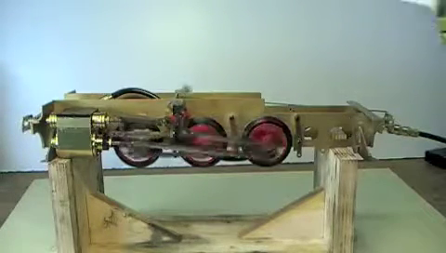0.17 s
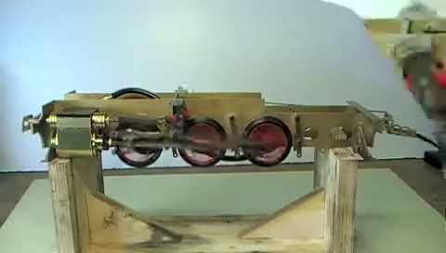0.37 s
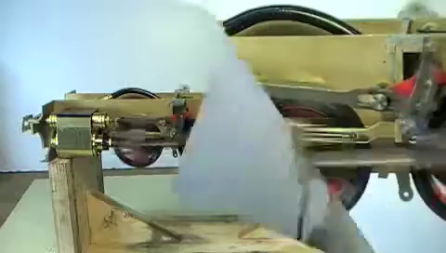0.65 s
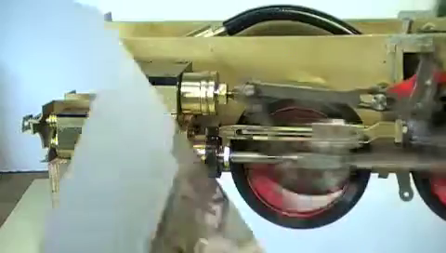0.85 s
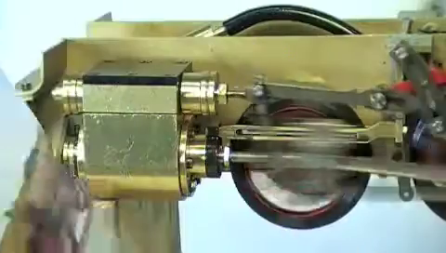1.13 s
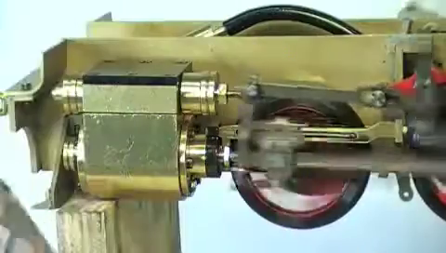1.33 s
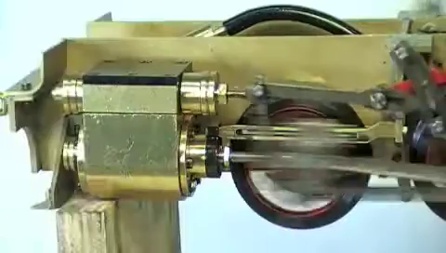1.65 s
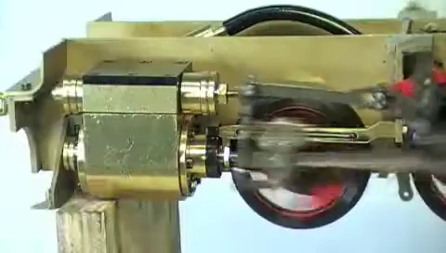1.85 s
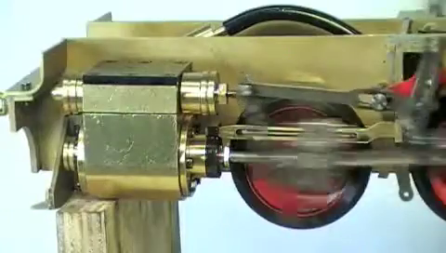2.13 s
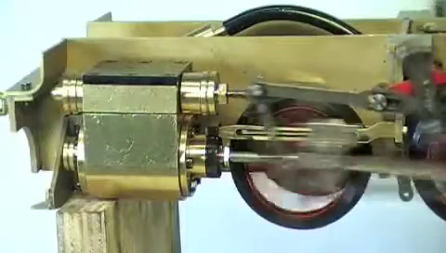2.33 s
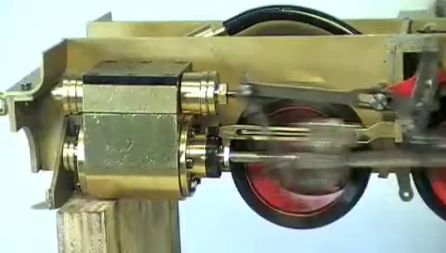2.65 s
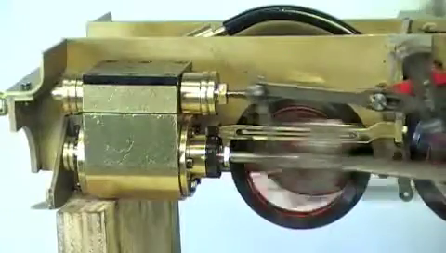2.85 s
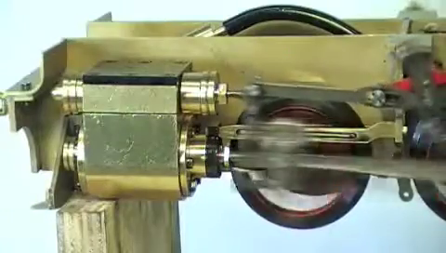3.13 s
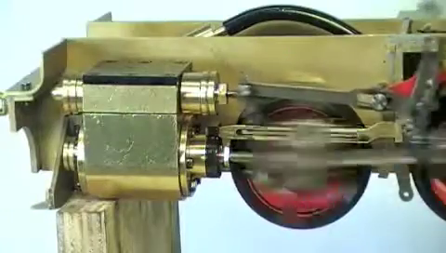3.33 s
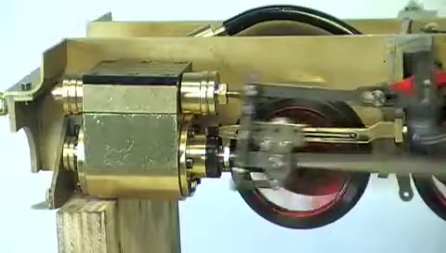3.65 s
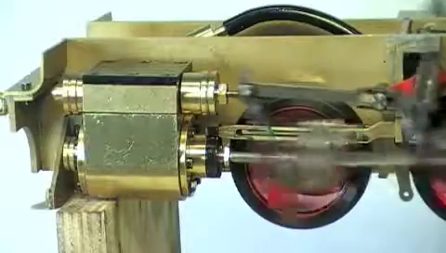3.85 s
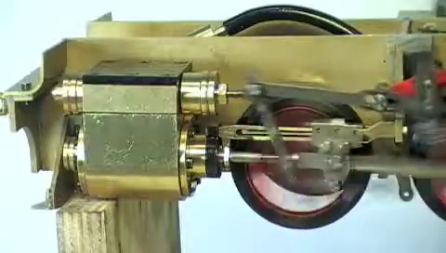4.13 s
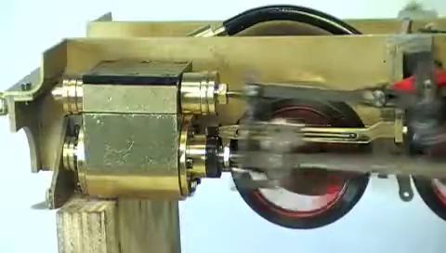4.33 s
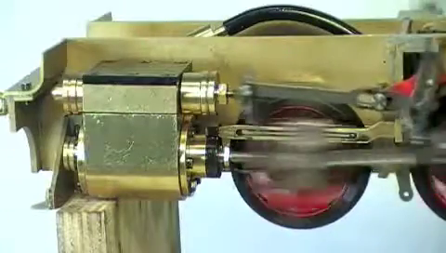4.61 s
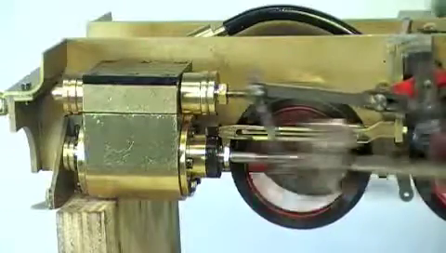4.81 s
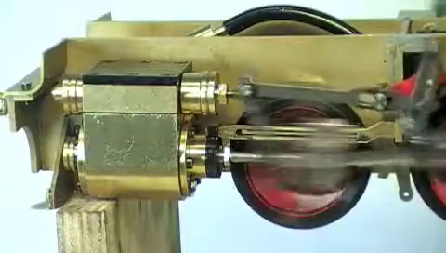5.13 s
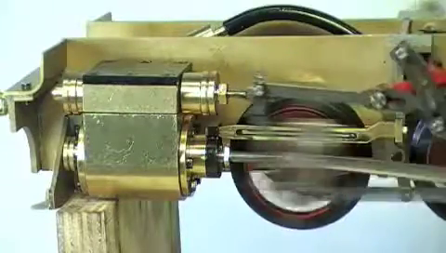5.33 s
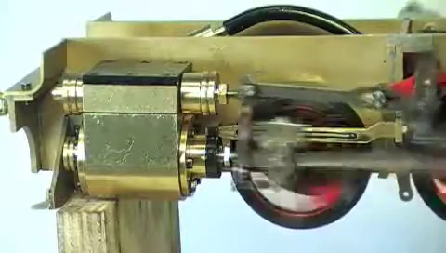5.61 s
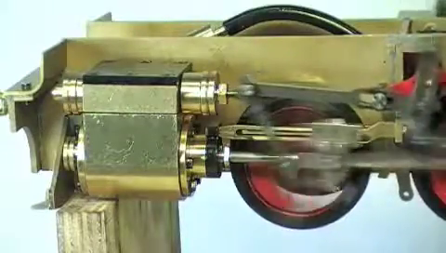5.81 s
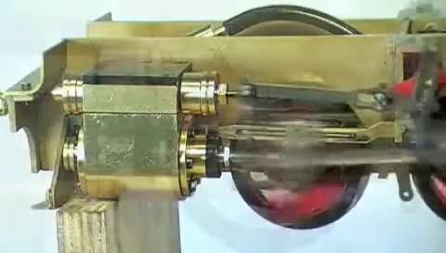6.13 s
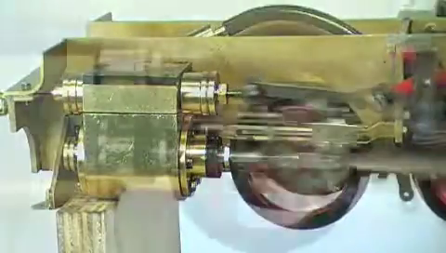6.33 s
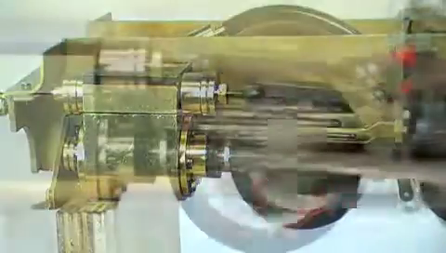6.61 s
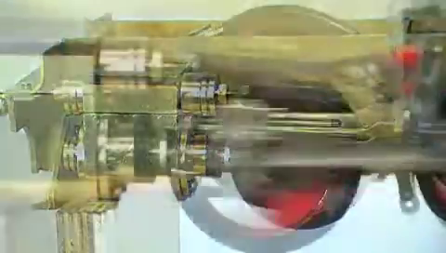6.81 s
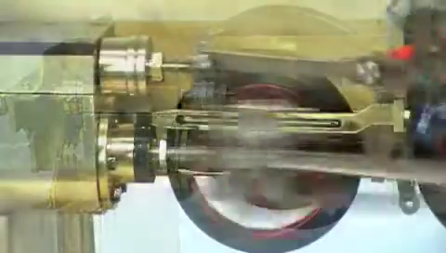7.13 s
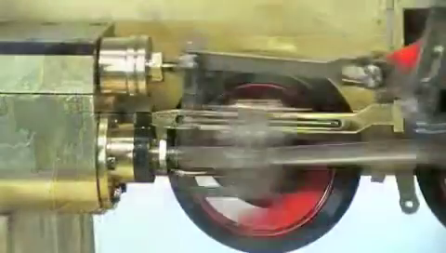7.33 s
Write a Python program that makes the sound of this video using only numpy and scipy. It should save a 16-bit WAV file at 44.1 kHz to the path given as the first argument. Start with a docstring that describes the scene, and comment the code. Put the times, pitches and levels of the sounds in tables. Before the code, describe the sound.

A small model steam locomotive runs at a fast, even speed on a wooden stand. Its exhaust beats blur into a rapid hissing flutter over a steady leak, while metal rods knock and the valve gear clicks, with tiny wet squeaks and a faint hum. After about a second the sound seems closer, and light stray clinks join in, mostly in the second half. The microphone is straight in front, in a small, fairly dry room.

```python
"""Model locomotive running free

A two-cylinder chassis turns about 13 times a second on a wooden stand in a small room. The crank angle
times four hissing exhaust beats a turn, valve-gear clicks, wet squeaks, the rub and groan of slides, and
knocks of slack rods that ring frame and stand. A leak, a frame hum, spits and stray clinks join them.
Of the run's four stretches, the first and last overlap their neighbours in slow fades; the others abut."""
import sys
import numpy as np
from scipy import signal
from scipy.fft import rfft, irfft, next_fast_len
from scipy.io import wavfile

SR = 44100
rng = np.random.default_rng(int(sys.argv[2]) if len(sys.argv) > 2 else 0)


def output_pcm(signal):
    """Save a mono or channel-first signal as 16-bit PCM at the path in sys.argv[1].

    Samples are clipped to [-1, 1] before scaling.
    """
    pcm = np.clip(np.atleast_2d(signal).T, -1, 1) * 32767
    wavfile.write(sys.argv[1], SR, np.round(pcm).astype(np.int16))


N = 328986
T = np.arange(N) / SR
SIZE = next_fast_len(N + SR // 2)
HZ = np.maximum(np.fft.rfftfreq(SIZE, 1 / SR), 1)

# Stretches of the run. Each row: start, fade-in, end and fade-out in seconds, starting crank angle in
# turns, speed in turns per second, slowing in turns per second squared.
STRETCHES = [(0, .001, 1.7, 1.7, .007, 13.67, .011), (0, 1.75, 4.062, .004, .012, 13.415, .0169),
             (4.058, .004, 7.55, 1.8, .606, 13.264, .046), (5.8, 1.8, 7.6, .001, .64, 13.31, 0)]
# Balance of each stretch. Each row: gains in dB of bark, hiss, knocks, squeaks and clicks, groans,
# the clicks' lower mode, and the low, middle and high hum.
EFFORT = [(1.3, -0.2, 0.67, -0.24, -2.4, 2.5, -41, -32.5, -58),
          (0.33, -0.23, 2, -0.7, -0.4, -1.5, -30.5, -73, -47),
          (0, -0.4, 0.88, -0.24, -0.56, 0, -31, -52, -49),
          (0.77, -1.1, 0.6, -1.2, -0.69, 3, -32.5, -61, -46.5)]
# Frame modes that hum. Each entry: frequency in Hz.
HUM_HZ = [267.7, 290, 361]
# Knocks of rods (one heavy) and axleboxes. Each row: angle in turns, contact in seconds, level in dB.
KNOCKS = [(.005, 0.00023, 1.5), (.047, 0.00025, -4), (.184, 0.000059, -8.5), (0.264, 0.00035, 5.5),
          (0.325, 0.0002, -6), (0.708, 0.00012, -2.5), (0.892, 0.00032, 0)]
# Squeaks at glands and ports. Each row: angle in turns, pitch in Hz, relative pitch scatter,
# half length in seconds, level in dB in the first half of the run and in the second.
SQUEAKS = [(0.08, 6770, 0.12, 0.00087, -23, -23), (.148, 3120, 0.048, 0.0013, -24.5, -24),
           (.155, 2514, 0.035, 0.0026, -30, -25), (.162, 8280, 0.016, 0.0018, -20.5, -22),
           (0.245, 7870, 0.064, 0.0021, -29, -24.5), (0.262, 3600, 0.17, 0.00084, -22, -23),
           (0.371, 8600, 0.092, 0.00074, -23.5, -27), (0.471, 8330, 0.013, 0.0019, -30.5, -28),
           (.505, 5320, 0.12, 0.00095, -22, -23), (0.634, 3300, 0.022, 0.0025, -24.5, -25),
           (0.655, 8280, 0.027, 0.0014, -21, -20), (0.771, 7490, 0.0056, 0.0013, -20, -19.5),
           (0.771, 3530, 0.038, 0.00088, -26, -36), (0.821, 5630, .08, 0.00099, -28, -35),
           (0.858, 8400, 0.016, 0.00065, -33, -34), (.877, 2430, 0.038, 0.0013, -28, -29)]
# Groans. Each row: angle in turns, pitch in Hz, half length in seconds, level in dB in each half run.
GROANS = [(0.091, 1130, 0.0008, -26.5, -36), (0.1, 578, 0.0039, -26, -25), (0.147, 1460, 0.0034, -39, -32),
          (0.148, 992.4, 0.012, -37.5, -36), (.252, 779, 0.004, -23, -23),
          (0.298, 348, 0.0029, -30.5, -26.5), (.45, 690, 0.0034, -26.5, -29.5),
          (0.551, 611, 0.013, -39, -38), (.64, 1235, 0.0034, -36, -40), (0.698, 590, 0.0088, -47.5, -45),
          (0.735, 771, 0.0043, -29.5, -35.5), (0.882, 1460, 0.0025, -29, -32),
          (0.961, 805, 0.0052, -34, -30)]
# Exhaust beats. Each row: angle, rise and length in turns, levels of bark, hiss and opening crack in dB.
BEATS = [(0.106, 0.012, 0.18, 11.5, 4.5, 4), (0.445, 0.016, 0.14, 9, 4.5, 7.5),
         (0.571, 0.0097, 0.27, 9.5, 2.5, 14), (0.83, 0.0084, 0.084, -3, 5.5, 17)]
# Lower and upper valve-gear modes. Each row: frequency in Hz, decay time in seconds.
GEAR_MODES = [(2560, 0.002), (3250, 0.0018)]
# Valve reversals. Each row: angle in turns, levels of the lower and upper gear mode in dB.
CLICKS = [(.122, -26, -25.5), (.461, -22, -22.5), (.585, -31.5, -26.5), (.836, -22, -24.5)]
# Harder catches of the gear. Each row: start in seconds, levels of the lower and upper mode in dB.
CLINKS = [(1.7997, -30, -15), (1.84, -14, -23), (1.8536, -15, -20), (2.572, -23, -13), (3.9485, -32, -16),
          (3.672, -14, -24), (3.8955, -19, -22), (4.2265, -16, -24), (4.2495, -20, -21), (4.2836, -30, -13),
          (4.3025, -13, -29), (4.7775, -14, -32), (4.8305, -10, -29), (4.981, -15, -16),
          (5.134, -10.5, -12), (5.307, -24, -20), (5.3433, -11, -16), (5.4935, -17, -21), (5.512, -15, -16),
          (5.5881, -11, -25), (5.6626, -16, -18), (5.6855, -28, -12), (5.721, -24, -15), (5.7385, -13, -27),
          (5.7613, -17, -22), (5.8366, -15, -22), (5.988, -14, -22), (6.101, -15, -24),
          (6.1189, -11.5, -24), (6.1775, -19, -26), (6.2161, -17, -18), (6.2925, -19, -25),
          (7.4145, -21, -28)]

# Resonators. Each row: frequency in Hz, bandwidth in Hz, relative level in dB.
FRAME_MODES = [(41.5, 23, -27), (104.9, 3.1, 0.5), (142.8, 13.6, 1), (173.2, 5.4, -0.5), (199.5, 36, -4.5),
               (304, 33, 2.5), (370.6, 11.2, -0.5), (393, 25, 6.5), (511.4, 11.5, 5), (573.2, 17, 8.5),
               (601.8, 8.8, 6.5), (639, 10, 8.5), (750, 29, 9), (819.7, 9.7, 11), (897, 14, 9.5),
               (979.3, 9.7, 9.5), (1025, 16, 9), (1234, 38, 2.5), (1370, 93, 5.5), (1817, 49, 13),
               (2780, 470, -16)]  # frame and stand
ROD_MODES = [(2500, 250, -16), (3350, 250, -10), (3940, 55, 7)]  # metal rods
BARK_MODES = [(1490, 820, 0), (2386, 380, 6.5), (2870, 180, 4), (3275, 270, 1), (3380, 140, -43),
              (3580, 27, -36)]  # exhaust passage, low
WHISTLE_MODES = [(7210, 110, -1), (7800, 130, 4.5), (8220, 77, 8.5), (8530, 130, 0), (10600, 110, 4.5),
                 (12370, 170, -4)]  # exhaust passage, high

# Spectra and filters. Each row: frequency in Hz, relative level in dB.
SCRAPE_COLOUR = [(60, -41), (110, -12.5), (250, 3), (420, 5), (470, 8), (600, -1), (690, -2.5), (900, -1),
                 (1100, -3), (1350, -3.5), (1700, 1), (2100, -12), (3000, -21), (5000, -37)]  # slide bars
LEAK_COLOUR = [(60, -31), (130, -17), (400, -15), (750, -9), (1100, -7), (1900, -2.5), (3200, 1),
               (4600, -3), (8400, -2), (9300, -6), (10700, -6), (11700, -16), (13300, -16)]  # steady leak
JET_COLOUR = [(50, -24), (130, -13), (450, -1), (800, -2.5), (1400, 1.5), (2000, -5.5), (3300, 0.5),
              (4500, -0.5), (6200, 1), (7200, -1), (8800, -1.5), (10200, -9.5), (11600, -41), (14500, -49)]  # broad rush of each jet
SPIT_COLOUR = [(1500, -25), (4500, -2), (8400, 0), (10500, -3), (13000, -9)]  # bursting droplets
FAR_COLOUR = [(60, 0), (110, 5), (190, 4), (260, 0.5), (370, -5), (460, 4.5), (600, 0), (750, -1.5),
              (900, -0.5), (1060, 5), (1420, -4), (1720, 3), (1950, 1), (2400, -2), (2700, 4), (3100, 0.5),
              (4400, -2), (5000, 0.5), (5280, 1.5), (5600, -2.5), (6500, 0)]  # heard from farther back
PATH_COLOUR = [(50, 2), (62, -6), (78, 4), (105, 0.5), (140, 1), (172, 1), (215, -1.5), (290, -0.5),
               (385, 2.5), (470, -3), (510, -0.5), (640, 0.5), (685, -4.5), (735, 1), (1040, 1), (1100, -1),
               (1220, 1), (1650, -0.5), (2550, 0.5), (2750, -3), (2880, 0.5), (3750, 0), (4000, 1),
               (4350, -2.5), (5100, -0.5), (7000, -1), (7850, 1), (8030, -7), (8250, -0.5), (8800, 2.5),
               (9050, -2), (9500, .5)]  # peaks and notches from nearby surfaces
ROOM_COLOUR = [(50, 0), (130, -3), (270, -14), (500, -7), (900, -3), (2000, 1), (5000, 0), (8500, 3),
               (13000, -1)]  # room reflections
# Imbalance of the two microphones. Each row: frequency in Hz, left minus right in dB.
MIC_BALANCE = [(60, 6), (110, 1.5), (200, 1.5), (380, 3.5), (700, 0.5), (1290, 1), (2380, 1), (4400, -1.5),
               (8120, 0), (15000, 3)]


def undb(db):
    """Amplitude grows tenfold for every 20 dB."""
    return 10 ** (np.asarray(db) / 20)


def level(x, db):
    """Normalisation sets the rms level in dB."""
    return x * undb(db) / np.sqrt(np.mean(x ** 2))


def shape(x, response):
    """Linear filtering multiplies a spectrum by a frequency response."""
    return irfft(rfft(x, SIZE) * response, SIZE)[..., :N]


def colour(points):
    """Interpolation in log frequency joins (Hz, dB) points into a response."""
    hz, db = np.transpose(points)
    return undb(np.interp(np.log(HZ), np.log(hz), db))


def resonances(modes):
    """Modal superposition: the responses of damped modes add."""
    return sum(undb(db) / (1 + 1j * (HZ ** 2 - hz ** 2) / (HZ * width)) for hz, width, db in modes)


def per_turn(turn):
    """Cycle-to-cycle variation: one normal random value for each turn."""
    return rng.standard_normal(N // 1024)[np.floor(turn).astype(int) + 2]


def bell(s, length):
    """A Gaussian envelope swells and dies away around s = 0."""
    return np.exp(-np.minimum(abs(s / length), 10) ** 2)


def burst(s, hz, length, cycles=0):
    """Amplitude modulation by a bell curve makes a tone burst."""
    return bell(s, length) * np.sin(2 * np.pi * (hz * s + cycles))


def wheels(start, fade_in, end, fade_out, angle, speed, slowing):
    """Uniform deceleration gives the crank angle and speed over one faded stretch."""
    on = (T >= start) & (T <= end)
    s = T[on] - start
    fade = np.minimum(s / fade_in, 1) * np.minimum((end - T[on]) / fade_out, 1)
    turn = angle + speed * s - slowing * s ** 2 / 2
    return on, fade, turn, speed - slowing * s


def hum(turn, speed, levels_db, width_hz=5.8):
    """Forced vibration: each frame mode follows the nearest wheel harmonic, weaker when off resonance."""
    out = 0
    for hz, db in zip(HUM_HZ, levels_db):
        harmonic = round(hz / speed.mean())
        mistuning = 2 * (harmonic * speed - hz) / width_hz
        out = out + undb(db) / np.hypot(1, mistuning) * np.cos(2 * np.pi * harmonic * turn)
    return out


def scrape(turn, roughness):
    """Sliding friction: the crossheads pass the same rough spots of the slide bars on every turn."""
    return np.interp(turn, np.arange(len(roughness)) / len(roughness), roughness, period=1)


def turbulence(power, sputter_hz=600, sputter_db=1.2):
    """Turbulent gas makes noise that follows the flow and sputters with the moisture in it."""
    sputter = np.interp(T * sputter_hz, np.arange(N // 16), rng.standard_normal(N // 16))
    return np.sqrt(power) * undb(sputter_db * sputter) * rng.standard_normal(N)


def knocks(turn, speed, scatter_db=.4, slop_s=.00003):
    """Impact: a bearing takes up its play with a force pulse; the shorter the contact, the brighter."""
    out = 0
    for angle, contact_s, db in KNOCKS:
        since = turn - angle + .5
        s = (since % 1 - .5) / speed + slop_s * per_turn(since)
        impulse = undb(db + scatter_db * per_turn(since))
        out = out + impulse / contact_s * bell(s, contact_s)
    return out


def squeaks(turn, speed, half, scatter_db=2.2):
    """Flow-excited tones: wet gas whistles at set crank angles, varying in pitch and strength."""
    out = 0
    for angle, hz, scatter, length, *levels_db in SQUEAKS:
        since = turn - angle + .5
        s = (since % 1 - .5) / speed
        pitch = hz * np.exp(scatter * per_turn(since))
        gain = undb(levels_db[half] + scatter_db * per_turn(since))
        out = out + gain * burst(s, pitch, length, cycles=per_turn(since))
    return out


def groans(turn, speed, half):
    """Friction tones: slides and bearings groan as the load swings over, alike on every turn."""
    out = 0
    for angle, hz, length, *levels_db in GROANS:
        s = ((turn - angle + .5) % 1 - .5) / speed
        out = out + undb(levels_db[half]) * burst(s, hz, length)
    return out


def exhaust(turn, crack_turns=.046, scatter_db=.4, slop_turns=.003):
    """Blowdown: each port cracks open and its cylinder empties, giving the power of bark and hiss."""
    bark = hiss = 0
    for angle, rise, length, bark_db, hiss_db, crack_db in BEATS:
        since = turn - angle
        opened = np.maximum(since % 1 - slop_turns * per_turn(since), 0)
        port = (1 - bell(opened, rise)) * undb(scatter_db * per_turn(since))
        flow = port * bell(opened, length)
        crack = port * bell(opened, crack_turns)
        bark = bark + (flow * undb(bark_db)) ** 2 + (crack * undb(crack_db)) ** 2
        hiss = hiss + (flow * undb(hiss_db)) ** 2
    return bark, hiss


def spits(power, per_second=45, scatter_db=4):
    """Shot noise: droplets burst at random in the ports, loudest while the gas flows hardest."""
    drops = rng.random(N) < per_second / SR
    return drops * np.sqrt(power) * undb(scatter_db * np.clip(rng.standard_normal(N), -2, 2))


def gear_ring(s, levels_db, detune, rise_s=.00043, pitch_scatter=.03):
    """Free vibration: the two gear modes decay exponentially after a blow at s = 0."""
    s = np.maximum(s, 0)
    ring = 0
    for (hz, decay_s), db, offset in zip(GEAR_MODES, levels_db, detune):
        pitch = hz * (1 + pitch_scatter * offset)
        envelope = undb(db) * np.exp(-np.minimum(s / decay_s, 30))
        ring = ring + envelope * np.sin(2 * np.pi * pitch * s)
    return (1 - np.exp(-np.minimum(s / rise_s, 30))) * ring


def clicks(turn, speed, ring_db, scatter_db=1.2, slop_turns=.0012):
    """Periodic impacts: four valve reversals a turn strike the gear, each a little differently."""
    out = 0
    for angle, lower_db, upper_db in CLICKS:
        since = turn - angle
        s = (since % 1 - slop_turns * per_turn(since)) / speed
        levels_db = [db + scatter_db * per_turn(since) for db in (lower_db + ring_db, upper_db)]
        out = out + gear_ring(s, levels_db, detune=[per_turn(since) for _ in GEAR_MODES])
    return out


def clinks():
    """Isolated impacts: now and then the gear catches harder and rings out."""
    out = np.zeros(N)
    for (start, *levels_db), detune in zip(CLINKS, rng.standard_normal((len(CLINKS), 2))):
        near = slice(int(start * SR), int(start * SR) + SR // 20)
        out[near] += gear_ring(T[near] - start, levels_db, detune)
    return out


def engine(ripple_points=70, rough_spots=500, jet_lag_turns=.032):
    """Source and filter: the stretches' excitations add, then ring the same pipes and frame."""
    bark, hiss, leak, blows, rub, tones = np.zeros((6, N))
    # the valves judder in the same way on every turn and ripple the flow
    ripple_angles = np.arange(ripple_points) / ripple_points
    ripple_db = .8 * rng.standard_normal(ripple_points)
    roughness = rng.standard_normal(rough_spots)
    for index, (stretch, effort) in enumerate(zip(STRETCHES, EFFORT)):
        bark_db, hiss_db, knock_db, valve_db, groan_db, ring_db, *hum_db = effort
        half = index // 2
        on, fade, turn, speed = wheels(*stretch)
        gas = fade * undb(np.interp(turn, ripple_angles, ripple_db, period=1))
        bark_power, hiss_power = exhaust(turn)
        bark[on] += bark_power * (gas * undb(bark_db)) ** 2
        hiss[on] += hiss_power * (gas * undb(hiss_db)) ** 2
        leak[on] += gas ** 2
        rub[on] += fade * scrape(turn, roughness)
        blows[on] += fade * undb(knock_db) * knocks(turn, speed)
        tones[on] += fade * undb(valve_db) * (squeaks(turn, speed, half) + clicks(turn, speed, ring_db))
        tones[on] += fade * (undb(groan_db) * groans(turn, speed, half) + hum(turn, speed, hum_db))
    # the broad rush builds a moment after the passage has begun to ring
    jet = np.interp(T - jet_lag_turns / speed.mean(), T, hiss)
    return (tones + clinks()
            + level(shape(blows, resonances(FRAME_MODES)), db=-37)
            + level(shape(blows, resonances(ROD_MODES)), db=-50)
            + level(shape(rub, colour(SCRAPE_COLOUR)), db=-42.5)
            + level(shape(turbulence(bark), resonances(BARK_MODES)), db=-34)
            + level(shape(turbulence(hiss), resonances(WHISTLE_MODES)), db=-36.5)
            + level(shape(spits(hiss), colour(SPIT_COLOUR)), db=-45)
            + level(shape(turbulence(jet), colour(JET_COLOUR)), db=-31)
            + level(shape(turbulence(leak), colour(LEAK_COLOUR)), db=-32.5))


def sound_path(x, far_until_s=.6, close_from_s=1.34):
    """Interference from nearby surfaces colours the sound, heard from farther back, then close by."""
    far = np.interp(T, [far_until_s, close_from_s], [1, 0])
    blend = far * shape(x, colour(FAR_COLOUR)) + (1 - far) * x
    return shape(blend, colour(PATH_COLOUR))


def scene(room_db=-10.5, t60_s=.16, first_echo_s=.002):
    """Reverberation: short reflections, unlike left and right, follow the engine straight ahead."""
    direct = sound_path(engine())
    s = T[:SR // 2]
    tail = rng.standard_normal((2, len(s))) * undb(-60 * s / t60_s) * (s > first_echo_s)
    tail /= np.linalg.norm(tail, axis=1, keepdims=True)
    return direct + undb(room_db) * shape(direct, rfft(tail, SIZE) * colour(ROOM_COLOUR))


def record(dry, low_hz=33, top_hz=13800):
    """Band limiting: two microphones of slightly unlike colour lose the deepest bass and the top."""
    heard = shape(dry, colour(MIC_BALANCE) ** np.array([[.5], [-.5]]))
    heard = signal.sosfilt(signal.butter(8, low_hz, "high", fs=SR, output="sos"), heard)
    return signal.sosfilt(signal.ellip(8, .2, 70, top_hz, fs=SR, output="sos"), heard)


dry = scene()
out = record(dry)
output_pcm(out)
```